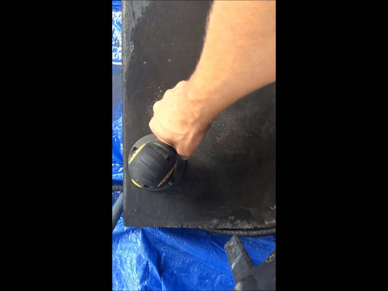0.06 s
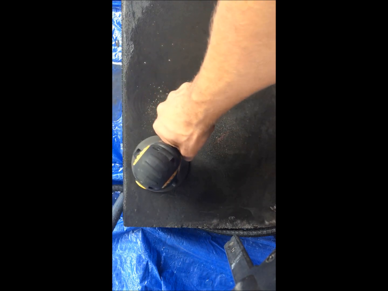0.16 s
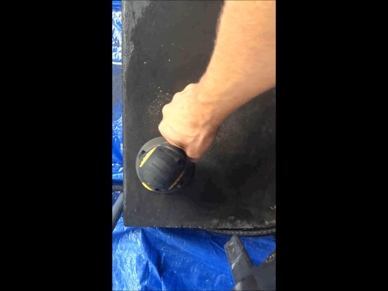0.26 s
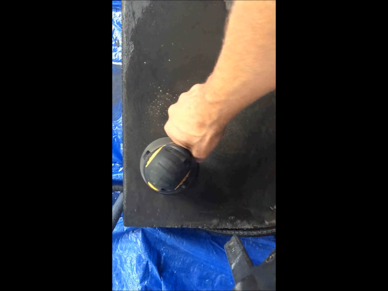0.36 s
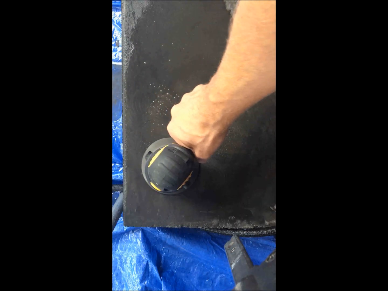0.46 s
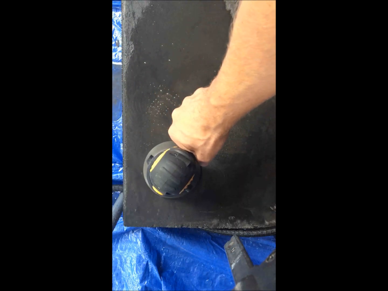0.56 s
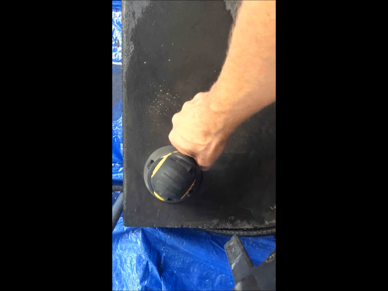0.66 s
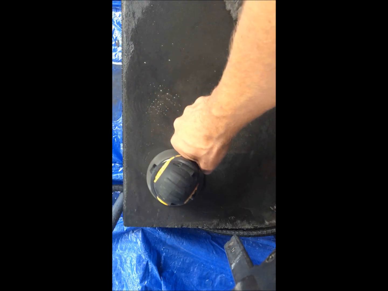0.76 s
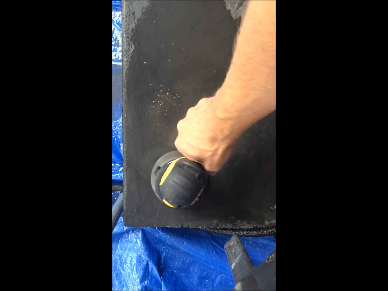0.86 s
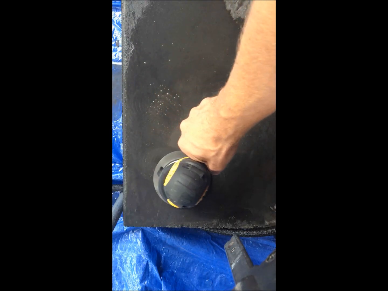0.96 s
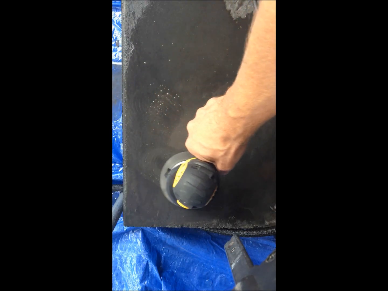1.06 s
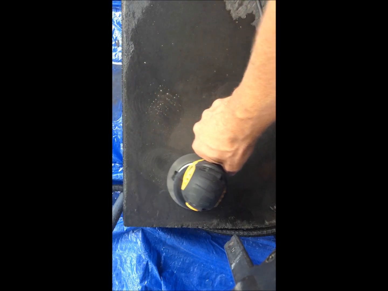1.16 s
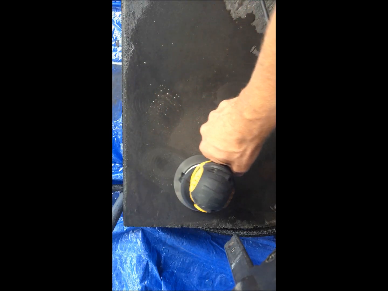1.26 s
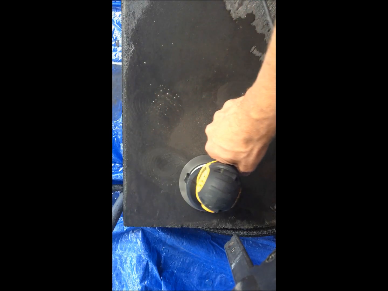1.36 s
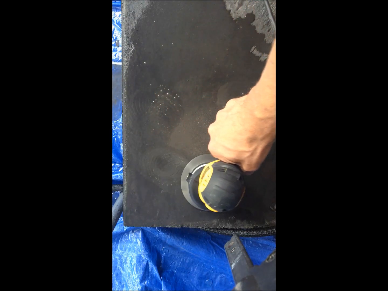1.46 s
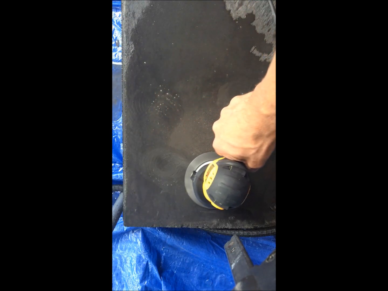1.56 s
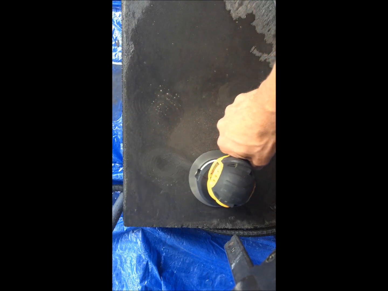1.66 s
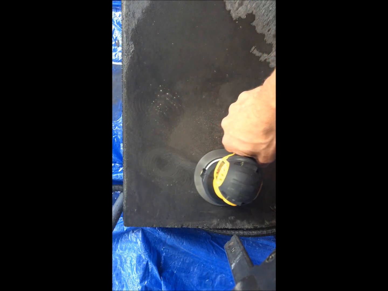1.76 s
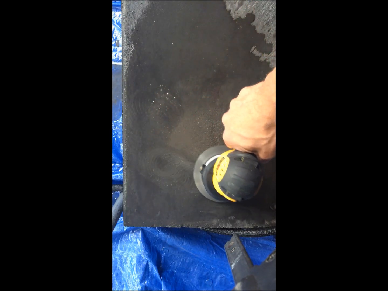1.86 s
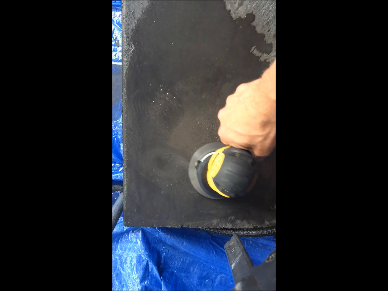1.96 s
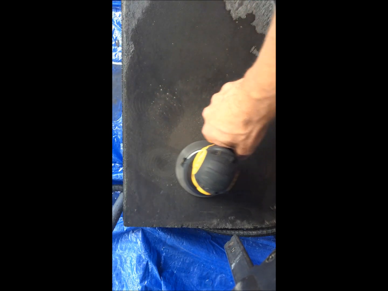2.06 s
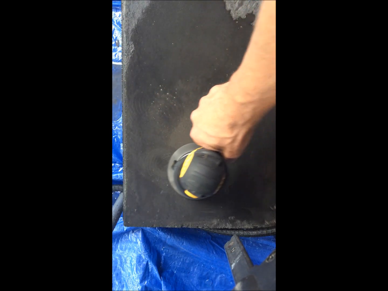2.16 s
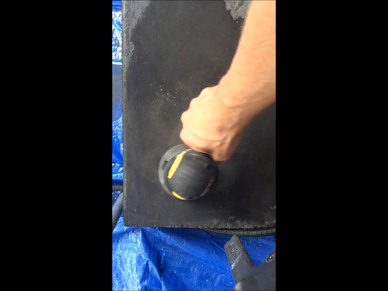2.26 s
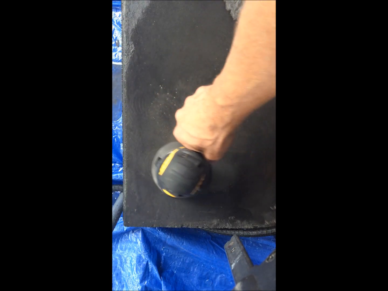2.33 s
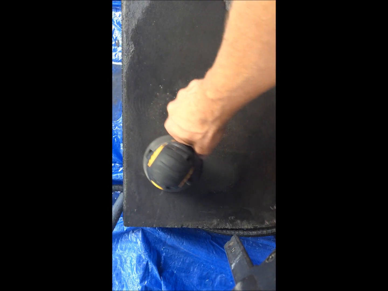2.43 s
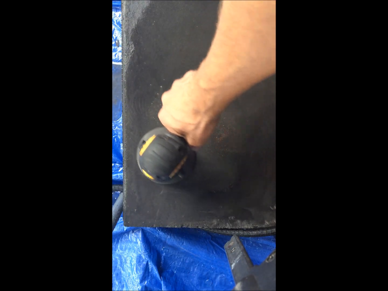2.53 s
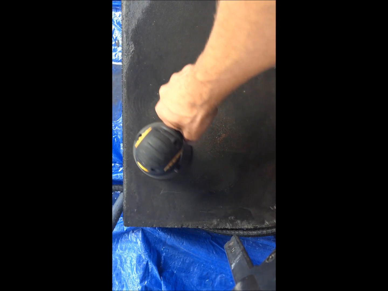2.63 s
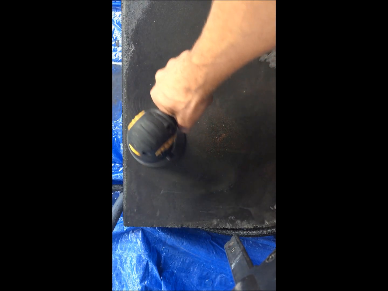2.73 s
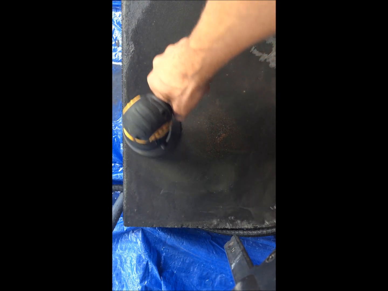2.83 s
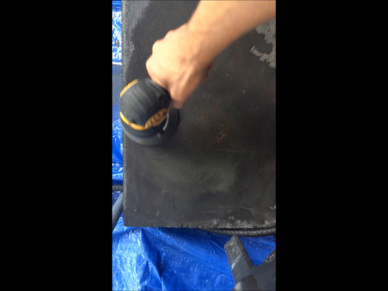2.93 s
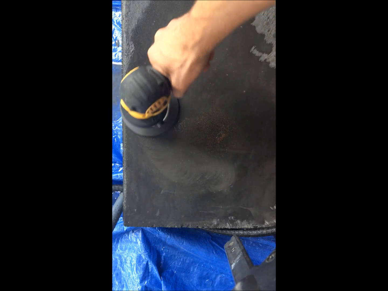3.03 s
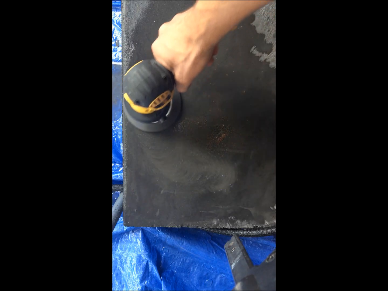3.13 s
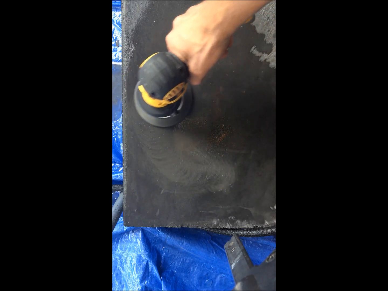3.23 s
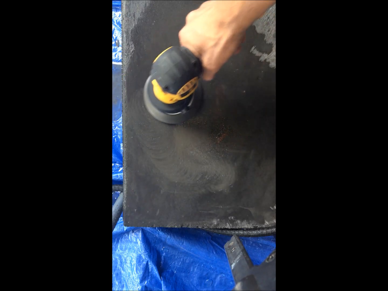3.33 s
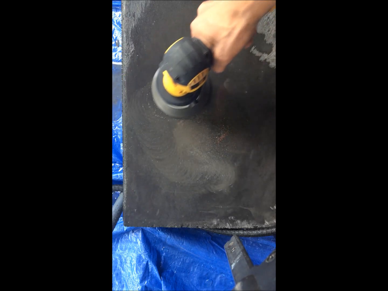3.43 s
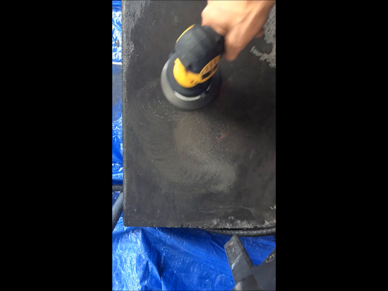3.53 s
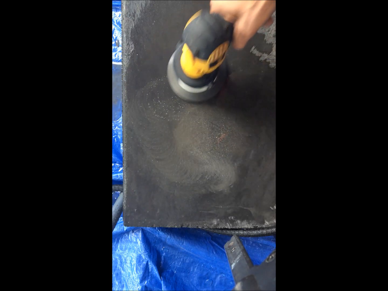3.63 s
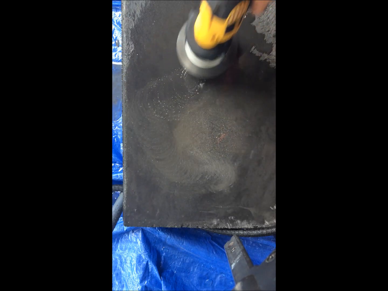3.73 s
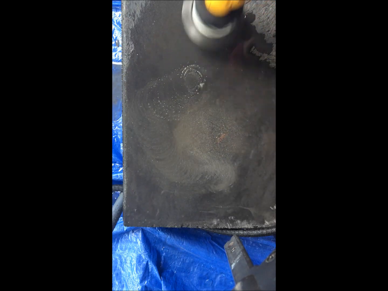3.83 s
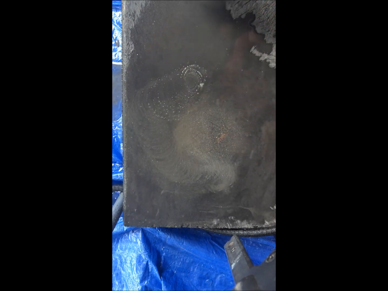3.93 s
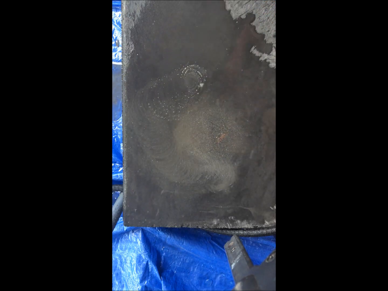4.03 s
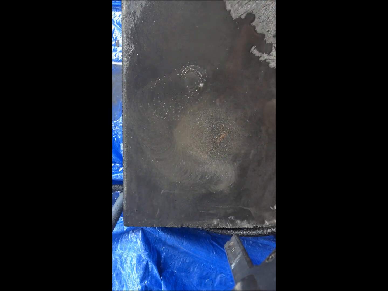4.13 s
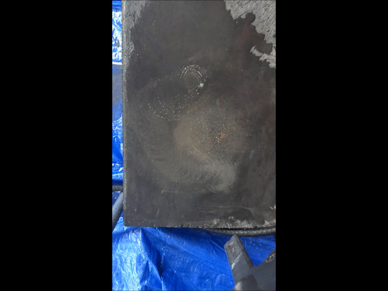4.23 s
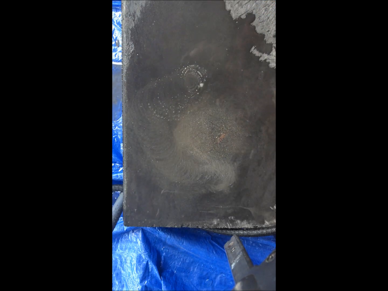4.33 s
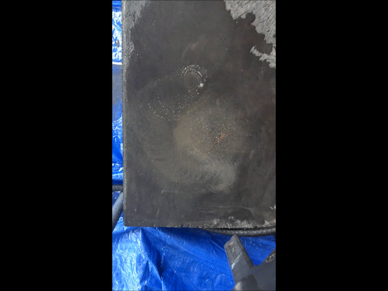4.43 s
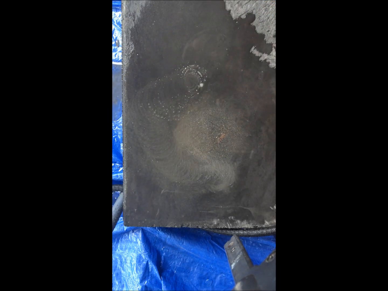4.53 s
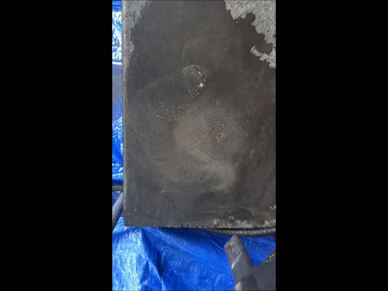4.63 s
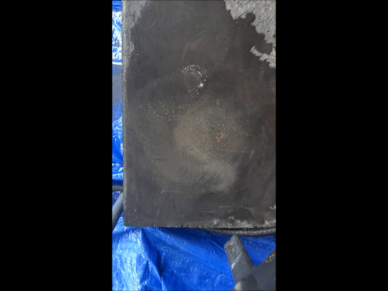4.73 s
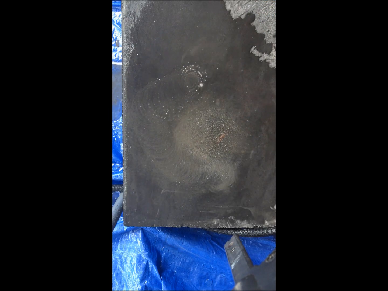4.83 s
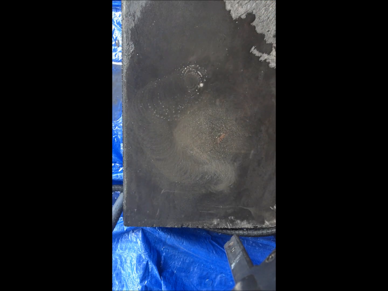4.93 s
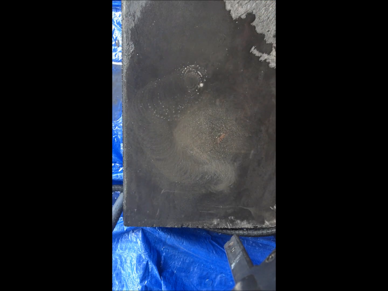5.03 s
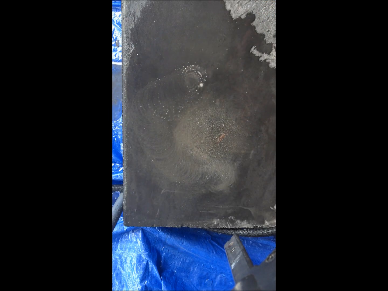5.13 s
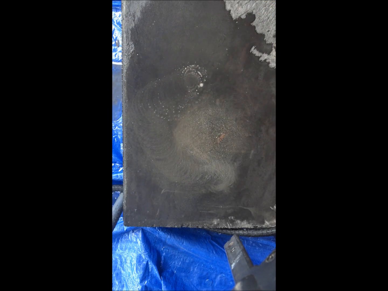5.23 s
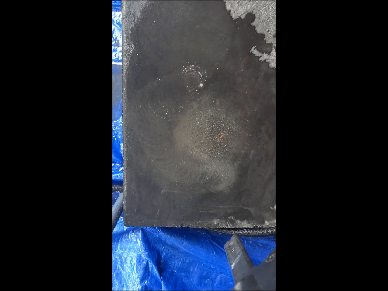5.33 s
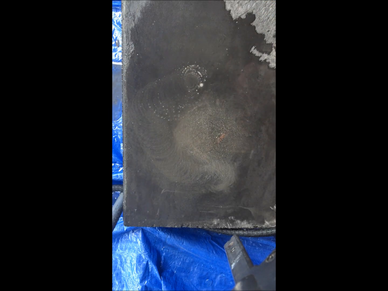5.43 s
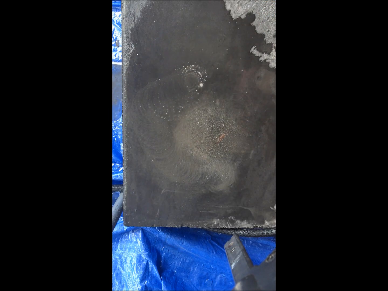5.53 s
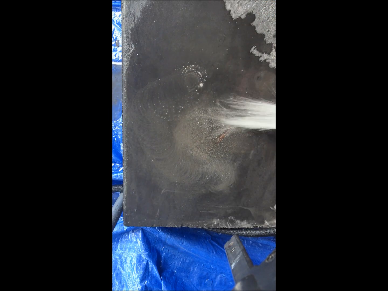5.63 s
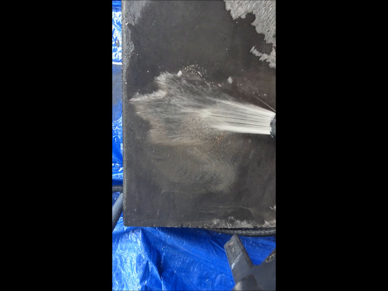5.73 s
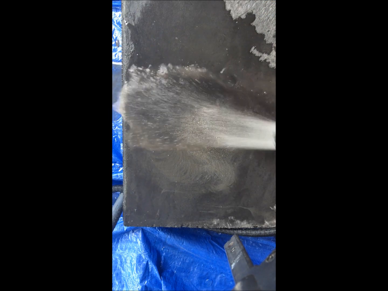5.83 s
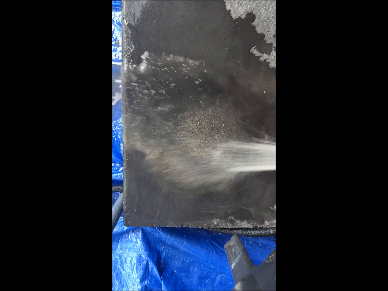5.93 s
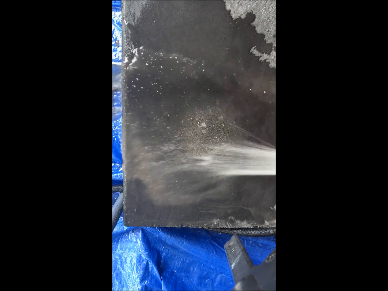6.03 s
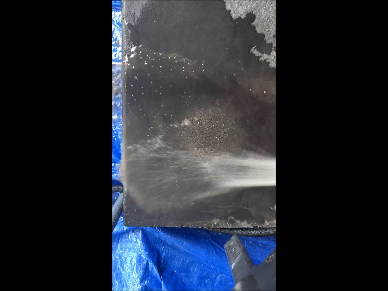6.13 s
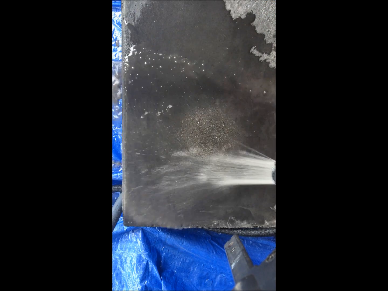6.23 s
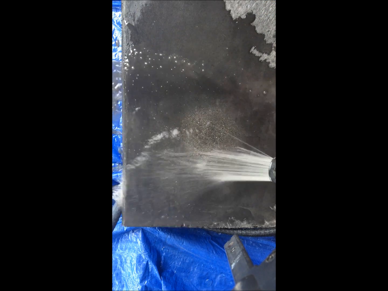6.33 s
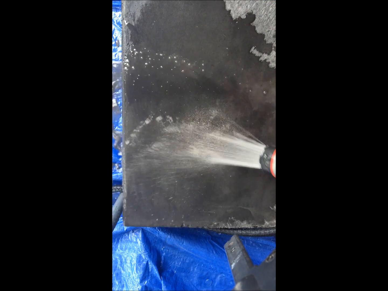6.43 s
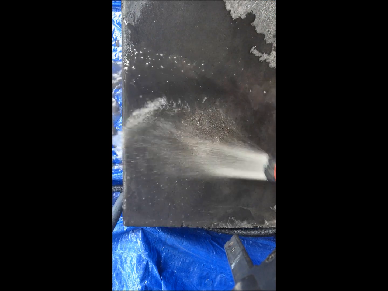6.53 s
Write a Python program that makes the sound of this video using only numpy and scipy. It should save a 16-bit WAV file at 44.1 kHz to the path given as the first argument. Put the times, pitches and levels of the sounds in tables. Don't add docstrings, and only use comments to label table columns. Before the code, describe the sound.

Close outdoors, a power sander grinds wet concrete with a bright, gritty hiss, throbbing about eighteen times a second. It lifts with a few scraping touches, and its motor whine slides down as the fan fades. A tarp rustles and snaps, the sander clacks onto a boomy bench, a nozzle clanks, then a thin water jet hisses steadily over faint insects.

```python
import sys
import numpy as np
from scipy import signal
from scipy.io import wavfile
from scipy.ndimage import uniform_filter1d

SR = 44100
rng = np.random.default_rng(int(sys.argv[2]) if len(sys.argv) > 2 else 0)


def boost_factor(decibels):
    exponent = np.asarray(decibels, float) / 20
    return 10 ** exponent


def persist_wave(psi):
    counts = np.round(np.clip(psi, -1, 1) * 32767).astype(np.int16)
    wavfile.write(sys.argv[1], SR, np.atleast_2d(counts).T)


N = 290178


def evened(x):
    return x / np.sqrt(np.mean(x ** 2) + 1e-20)


def read(points, hz):
    f, value = np.transpose(points)
    return np.interp(np.log(hz + 1), np.log(f + 1), value)


def curves(rows, fade=.01):
    s, *columns = np.transpose(rows)
    t = np.arange(N) / SR
    since_start = t - s[0] + fade * (s[0] < fade)
    until_end = s[-1] + fade - t
    gate = np.clip(np.minimum(since_start, until_end) / fade, 0, 1)
    return gate, *(np.interp(t, s, c) for c in columns)


def slow(per_s):
    lowpass = signal.butter(2, per_s, fs=SR, output="sos")
    return evened(signal.sosfilt(lowpass, rng.standard_normal(N)))


def hiss(shape, patchy_db=4.0, grit=0.0, grit_db=7.0):
    sizes = np.minimum(rng.exponential(1, N), 3)
    grains = rng.standard_normal(N) * boost_factor(grit_db * sizes) * (rng.random(N) < .15)
    source = rng.standard_normal(N) + grit * evened(grains)
    hz, _, z = signal.stft(source, SR, nperseg=1024, noverlap=768)
    patches = uniform_filter1d(rng.standard_normal(z.shape), size=7, axis=0)
    patches = evened(uniform_filter1d(patches, size=6, axis=1))
    colour = boost_factor(read(shape, hz)[:, None] + patchy_db * patches)
    return evened(signal.istft(z * colour, SR, nperseg=1024, noverlap=768)[1][:N])


def resonate(x, hz, width):
    r = np.exp(-np.pi * width / SR)
    if np.ndim(hz) == 0:
        return 2 * signal.lfilter([1 - r], [1, -r * np.exp(2j * np.pi * hz / SR)], x).real
    turn = np.exp(2j * np.pi * np.cumsum(hz) / SR)
    return 2 * (turn * signal.lfilter([1 - r], [1, -r], x * turn.conj())).real


def split(x, hz):
    low = signal.sosfiltfilt(signal.butter(2, hz, fs=SR, output="sos"), x)
    return low, x - low


def tone(hz, db, waver_db=1.0):
    return np.sqrt(2) * boost_factor(db + waver_db * slow(5)) * np.sin(2 * np.pi * np.cumsum(hz) / SR)


def grind():
    # time in seconds, pressure in dB, how flat the pad lies and rings in dB.
    hand = [(0.0, -17.5, -5.5), (0.35, -17, -0.5), (0.6, -21, 0), (1.1, -20, 3.5), (1.3, -17.5, -7.5),
            (1.55, -18, 6), (1.95, -19.5, 17), (2.2, -19.5, 8), (2.5, -18, 2.5), (3.0, -19, -0.5),
            (3.4, -19.5, -4), (3.53, -20, -3), (3.6, -33, -19), (3.66, -60, 0)]
    # frequency in Hz, level in dB per Hz.
    grit_spectrum = [(700, -61), (1200, -23), (2200, -14.5), (2650, -11), (2850, -3.5), (3900, -4),
                     (4650, -8), (4850, -8), (6400, -4), (7300, -6.5), (10100, -9.5), (10600, -13.5),
                     (12400, -12), (13500, -23)]
    # frequency in Hz, width in Hz, level in dB.
    pad_rings = [(3180, 200, -23.5), (3850, 700, -9), (4330, 110, -23), (4360, 92, -18)]
    # frequency in Hz, width in Hz, level in dB.
    rim_rings = [(3063, 240, -11), (4550, 260, -10)]
    # time in seconds, lead in turns, throb depth in dB.
    wobble = [(0.0, .5, 2.5), (.3, .52, 0.5), (.72, .46, 9.5), (.95, .37, 6.5), (1.35, .45, 4.5),
              (1.65, .46, 4.5), (2.05, .4, 0), (2.3, .15, -1.5), (2.8, .26, 1), (3.2, .03, 1.2),
              (3.6, .15, 2)]
    # time in seconds, depth in dB.
    chatter = [(1.82, 0), (1.86, 1), (2.0, 4.5), (2.03, 2.5), (2.07, 4), (2.12, 0.5)]
    # time in seconds, jump in dB.
    catches = [(.394, 0.5), (.449, -1), (0.712, -0.5), (.826, -1), (.882, -0.5), (.927, -5), (.939, 5),
               (1.049, 2.5), (1.33, 1), (1.012, 4), (1.022, 0), (1.255, -2), (1.458, 1), (1.513, 2),
               (1.684, 1), (1.741, 3), (1.774, 0.5), (1.81, -4), (2.119, 2), (2.146, 2.5), (2.202, 1),
               (2.227, -3.5), (2.253, 3.5), (2.311, 7), (2.369, 6.5), (2.397, -1), (2.407, 6), (2.465, 0.5),
               (2.488, 5), (2.5, -7), (2.515, 4.5), (2.541, 4), (2.593, 7.5), (2.604, -2), (2.63, 3.5),
               (2.767, 5), (2.799, 4.5), (2.877, 4.5), (2.917, 3), (2.935, -1.5), (2.979, 5), (3.01, -2),
               (3.038, -1), (3.092, 1.5), (3.147, -5), (3.229, 5), (3.281, 4.5), (3.313, -5), (3.34, 1),
               (3.37, 6)]
    # time in seconds, rim ring in dB, hiss in dB.
    slurry = [(0.0, -1, -0.5), (.3, -4.5, -4.5), (.6, 4.5, 0), (.9, 1.5, -3), (1.2, 1.5, 2), (1.5, 1, 0),
              (1.8, -5.5, -.5), (2.2, -16, -1.5), (2.6, -10.5, -2.5), (3.0, -13.5, 1), (3.4, -14, -2),
              (3.67, -10, 1)]
    pad_turns_per_s, treble_lag_turns = 17.7, .06
    chatter_per_s, chatter_peak_s, catch_s = 51, 1.967, .005
    t = np.arange(N) / SR

    gate, pressure_db, ring_db = curves(hand)
    bright_db = -7 + 0.64 * np.clip(-29 - pressure_db, 0, 12)

    _, lead, depth_db = curves(wobble)
    turn = 2 * np.pi * (pad_turns_per_s * t + lead)

    def throb_db(angle):
        return 0.9 * depth_db * (np.cos(angle) - 0.12 * np.cos(2 * angle) - 0.08 * np.sin(2 * angle))

    bite_db = throb_db(turn)
    late_db = throb_db(turn - 2 * np.pi * treble_lag_turns)

    catch_db = curves(chatter)[1] * np.cos(2 * np.pi * chatter_per_s * (t - chatter_peak_s))
    for s, db in catches:
        near = slice(round(s * SR) - 800, round(s * SR) + 800)
        catch_db[near] += db * np.exp(-((t[near] - s) / catch_s) ** 2)
    jitter_db = .9 * evened(resonate(rng.standard_normal(N), 60, 60)) + .6 * slow(250)

    grit = hiss(grit_spectrum, patchy_db=1.4, grit=.3)
    flat_ring = np.zeros(N)
    for hz, width, db in pad_rings:
        wandering_hz = hz * (1 + 0.021 * slow(18.0))
        flat_ring += boost_factor(db + 0.41 * slow(40)) * evened(resonate(grit, wandering_hz, width))
    _, rim_db, hiss_db = curves(slurry)
    rim = sum(boost_factor(db + rim_db) * evened(resonate(grit, hz, width)) for hz, width, db in rim_rings)

    low, high = split(grit, 5630)
    body = boost_factor(bite_db + catch_db) * (evened(low) + boost_factor(0.81 * ring_db) * flat_ring + rim)
    treble = boost_factor(bright_db + hiss_db + late_db + 0.29 * catch_db) * evened(high)
    return gate * boost_factor(pressure_db - 6.0 + jitter_db) * (body + treble)


def touches():
    # start in seconds, peak in dB, ring in Hz, width in Hz, held in seconds.
    contacts = [(3.4255, -1, 3470, 1260, 0.0033), (3.442, -8.5, 3300, 1000, 0.007),
                (3.476, -10, 3600, 1400, 0.01), (3.489, -11, 3130, 930, 0.0053),
                (3.536, -23, 4000, 1200, 0.0074), (3.546, -10, 3250, 900, 0.0085),
                (3.574, -13, 6600, 990, 0.0041), (3.585, -12.5, 4100, 1800, 0.0039),
                (3.613, -15.5, 3550, 980, 0.0065), (3.615, -22, 7600, 5800, 0.0077),
                (3.642, -27, 4000, 3000, .004), (4.061, -47, 300, 390, 0.075),
                (4.15, -43.5, 260, 380, 0.087), (5, -34.5, 2500, 1500, .05), (5.126, -27, 1300, 450, 0.04),
                (5.165, -36, 1350, 500, 0.045), (5.215, -46, 1100, 500, 0.065),
                (5.2, -42, 2300, 1500, 0.046), (5.079, -26.5, 1460, 900, 0.023),
                (5.093, -23.5, 2650, 1100, 0.025), (4.76, -31.5, 7500, 5000, 0.022),
                (5.7, -21, 6900, 1900, 0.038), (5.595, -44, 3000, 3000, .01), (5.27, -46, 1360, 640, 0.081),
                (5.607, -33, 5100, 900, 0.021), (5.647, -24.5, 3100, 900, .003),
                (5.721, -25, 7000, 4000, .001), (5.749, -26, 7000, 4000, .002),
                (6.044, -26, 7500, 4000, .001), (6.063, -35, 8500, 4000, .001)]
    out, t = np.zeros(N + 4000), np.arange(4000) / SR
    for s, db, hz, width, held in contacts:
        shape = np.clip(t / 0.001, 0, 1) * boost_factor(-60 * np.maximum(t - held, 0) / 0.045)
        noise = rng.standard_normal(4000)
        ring = evened(resonate(resonate(noise, hz, width), hz, width))
        out[round(s * SR):][:4000] += boost_factor(db - 12.0) * shape * ring
    return out[:N]


def motor():
    # time in seconds, housing roar in dB.
    fan = [(0.0, -41.5), (.5, -42.5), (2.3, -41.5), (3.1, -41.5), (3.55, -41.5), (3.7, -38), (3.92, -40.5),
           (4.03, -45), (4.06, -47), (4.15, -48.5), (4.2, -49.5), (4.3, -57), (4.6, -65)]
    # frequency in Hz, level in dB per Hz.
    roar_spectrum = [(88, -52), (150, -42), (311, -28.5), (404, -17), (578, -9.5), (636, -13), (716, -7),
                     (1010, -9.5), (1140, -9.5), (2120, -10.5), (2600, -35), (3380, -48), (5720, -120)]
    # frequency in Hz, width in Hz, level in dB.
    housing = [(1150, 210, 8), (750, 150, -14), (1780, 300, -7)]
    # frequency in Hz, level in dB per Hz.
    vent_spectrum = [(1300, -32), (2200, -11), (3000, -4), (4800, -2.5), (6500, 1.5), (7200, -4),
                     (9500, -4), (10300, -10.5), (13500, -11.5)]
    # time in seconds, pitch in Hz, level in dB.
    shaft = [(0.0, 276, -65), (0.27, 271, -70.5), (2.35, 279.4, -65.5), (3.09, 268, -67.5), (3.5, 254, -61)]
    gate, roar_db = curves(fan, fade=0.24)
    loaded, shaft_hz, shaft_db = curves(shaft, fade=0.061)
    roar = hiss(roar_spectrum, patchy_db=1.5)
    roar = evened(roar + sum(boost_factor(db) * evened(resonate(roar, hz, width)) for hz, width, db in housing))
    vent = hiss(vent_spectrum, patchy_db=2.0)
    vent_db = -38 + 0.52 * (roar_db + 37.0) + 8 * loaded
    air = gate * (boost_factor(roar_db - 0.5) * roar + boost_factor(vent_db) * vent)
    return air + loaded * tone(shaft_hz, shaft_db, waver_db=-0.5) + coast()


def coast():
    # order, resonance in Hz, width in Hz, level in dB.
    flares = [(12, 3180, 130, -48.5), (12, 2900, 350, -56), (12, 2600, 120, -58), (12, 2380, 150, -49),
              (18, 3950, 200, -58), (18, 3600, 250, -53), (18, 4560, 200, -48), (18, 3250, 200, -51),
              (20, 4350, 300, -56), (20, 3580, 200, -51), (24, 6350, 200, -46), (24, 5470, 360, -40),
              (24, 4750, 110, -44), (24, 4000, 900, -54), (36, 8070, 200, -53), (16, 4000, 120, -54),
              (16, 3150, 300, -53)]
    lifted_s, off_s, still_s, hidden_s = 3.63, 3.72, 4.5, 4.033
    brush_hz, sag_hz_per_s, drag_s = 3183, 2200, 2.96
    free = curves([(lifted_s, 1), (still_s, 1)])[0]
    since_off = np.maximum(np.arange(N) / SR - off_s, 0)
    shaft_hz = (brush_hz - sag_hz_per_s * drag_s * (1 - np.exp(-since_off / drag_s))) / 12
    out = np.zeros(N)
    for order in {row[0] for row in flares}:
        hz = np.maximum(order * shaft_hz, 0)
        size = sum(boost_factor(db) * np.exp(-((hz - at) / width) ** 2)
                   for k, at, width, db in flares if k == order)
        blur = evened(resonate(rng.standard_normal(N), hz, 140))
        out += size * (tone(hz, 0, waver_db=1) + boost_factor(-5.0) * blur)
    hidden = np.clip((since_off + off_s - hidden_s) / 0.0092, 0, 1)
    return free * out * boost_factor(-8 * hidden)


def knocks(rows, modes, crack_db, crack_t60):
    out, t = np.zeros(N + 8000), np.arange(8000) / SR
    rise = np.clip(t / .001, 0, 1)
    for s, db, thud_db, tick_db, ring in rows:
        noise = rng.standard_normal(8000)
        body = np.zeros(8000)
        for hz, mode_db, t60 in modes:
            uneven, detune, phase = rng.standard_normal(3)
            decay_db = -60 * t / (t60 * np.clip(2 * ring, .4, 1.5))
            swell = np.clip(t * hz, 0, 1)
            wave = np.sin(2 * np.pi * hz * (1 + .03 * detune) * t + 3 * phase)
            body += boost_factor(mode_db + 2 * uneven + decay_db) * swell * wave
        crack_band = split(split(noise, 4500)[0], 230)[1]
        crack = boost_factor(crack_db - 60 * t / crack_t60) * evened(crack_band)
        thud = boost_factor(thud_db - 60 * t / 0.097) * np.sin(2 * np.pi * 130 * t) * np.clip(t / 0.0028, 0, 1)
        tick = boost_factor(tick_db - 60 * t / 0.076) * split(split(noise, 9400)[0], 5100)[1]
        out[round(s * SR):][:8000] += (boost_factor(db) * (body / abs(body).max() + crack) + thud + tick) * rise
    return out[:N]


def bench_knocks():
    # start in seconds, peak in dB, thud in dB, tick in dB, decay time factor.
    blows = [
        (4.7675, -24, -45, -40, .3),
        (4.774, -13, -34, -24, .3),
        (4.7758, -8, -26, -24, .4),
        (4.783, -17, -36, -38, .4),
        (4.79, -17, -38, -44, .4),
        (4.7965, -23, -42, -47, .4),
        (4.826, -27, -46, -47, .4),
        (4.8408, -15, -46, -33, .25),
    ]
    # frequency in Hz, level in dB, t60 in seconds.
    bench = [(137, -4, 0.037), (258, -5.5, 0.034), (396, 0, 0.024), (635, 9.5, 0.0091), (770, -11, 0.018),
             (1350, -1.5, 0.01406), (2120, -2, 0.0041), (3040, 4.5, 0.0051)]
    return knocks(blows, bench, crack_db=-12.0, crack_t60=0.028)


def nozzle_clanks():
    # start in seconds, peak in dB, thud in dB, tick in dB, decay time factor.
    blows = [
        (5.085, -28, -61, -29, 0.64),
        (5.103, -23, -64, -31, 0.44),
        (5.114, -14.5, -57, -25, 0.64),
        (5.118, -29, -60.0, -37, 0.45),
        (5.126, -26.5, -61, -46, 0.42),
        (5.132, -28, -61, -45, 0.5),
    ]
    # frequency in Hz, level in dB, t60 in seconds.
    nozzle = [(620, -5, .04), (1050, -4, .03), (1270, -3, .03), (1470, -1, .04), (1750, -5, .025),
              (2250, -4, .02), (2700, -4, .025)]
    return knocks(blows, nozzle, crack_db=-6.0, crack_t60=0.025)


def hose_bumps():
    # start in seconds, peak in dB, thud in dB, tick in dB, decay time factor.
    blows = [
        (5.066, -38.5, -35, -57, 0.79),
        (6.017, -43.5, -49, -80, 0.41),
        (6.051, -42, -62, -62.0, 0.39),
        (6.088, -38.5, -52, -62.0, 0.24),
        (6.13, -46, -60, -60, .6),
        (6.323, -30, -62, -50, 0.5),
        (6.519, -38, -64, -73, 0.27),
    ]
    # frequency in Hz, level in dB, t60 in seconds.
    hose = [(256, -1.5, 0.074), (330, -3.5, 0.05), (1240, -5, 0.025), (2280, -6.5, 0.018)]
    return knocks(blows, hose, crack_db=-10, crack_t60=.05)


def snaps():
    # start in seconds, peak in dB, treble in dB, t60 in seconds, held in seconds.
    bursts = [(4.449, -51, 6, 0.017, 0.0016), (4.477, -50, 1, 0.017, 0.0056), (4.525, -45, 8, .015, 0.0018),
              (4.538, -42, 3, 0.014, 0.0016), (4.61, -42, 1, 0.033, 0.017), (4.686, -35.5, -2, .03, 0.0025),
              (4.716, -41, -4, 0.023, 0.0052), (4.745, -43, 2, .02, .003), (4.874, -44, 5, 0.017, 0.0017),
              (4.93, -40.5, 4.5, .02, 0.0052), (4.961, -57, -4, .015, 0.0026),
              (5.029, -45, -1, 0.012, .002), (5.056, -35, -11, 0.0092, 0.0017),
              (5.299, -70.5, -6, 0.022, .003), (5.571, -60, -4, .015, .003)]
    out, t = np.zeros(N + 4000), np.arange(4000) / SR
    for s, db, treble_db, t60, held in bursts:
        noise = rng.standard_normal(4000)
        low, high = split(split(noise, 10800)[0], 3600)
        mid = split(low, 702)[1]
        shape = np.clip(t / 0.0019, 0, 1) * boost_factor(-60 * np.maximum(t - held, 0) / max(t60, .005))
        out[round(s * SR):][:4000] += boost_factor(db) * shape * (evened(mid) + boost_factor(treble_db) * evened(high))
    return out[:N]


def rustle():
    # time in seconds, level in dB.
    motion = [
        (4.25, -52),
        (4.5, -58),
        (4.8, -46),
        (5.0, -47),
        (5.25, -56),
        (5.5, -77.5),
    ]
    gate, level_db = curves(motion, fade=0.025)
    texture = dict(patchy_db=1.5, grit=.7)
    shuffle = hiss([(60, -24), (150, -7.5), (900, -10.5), (1600, -10.5), (3000, -26.5)], **texture)
    crinkle = hiss([(1000, -24), (2200, 5.5), (3300, 4.5), (6000, -3.5), (9500, -6.0), (12000, -30.0)],
                   **texture)
    clumps_db = 1.5 * slow(30)
    low_db = -52 + 0.81 * (level_db + 49)
    return gate * boost_factor(clumps_db) * (boost_factor(low_db) * shuffle + boost_factor(level_db) * crinkle)


def jet():
    # time in seconds, flow in dB.
    flow = [(5.594, -54), (5.603, -49), (5.609, -40), (5.624, -39.5), (5.641, -34), (5.648, -36.5),
            (5.677, -35.5), (5.687, -37), (5.74, -38), (5.87, -42), (6.32, -41.5), (6.42, -42), (6.58, -40)]
    # frequency in Hz, level in dB per Hz.
    spray_spectrum = [(1470, -57), (2500, -41), (3530, -37), (4070, -13), (4820, -15), (5320, -8),
                      (6260, -10), (7950, -9), (9220, -3.5), (10400, -9), (11500, -3.5), (12700, -5.5),
                      (13500, -13.5)]
    # frequency in Hz, level in dB per Hz.
    splash_spectrum = [(300, -14), (900, -7.5), (1500, -6.5), (2600, -6), (4000, -3), (6000, 0.5),
                       (9000, -8)]
    gate, flow_db = curves(flow, fade=.003)
    spray = boost_factor(flow_db + .8 * slow(40)) * hiss(spray_spectrum, patchy_db=1.5, grit=.4)
    splash_db = -58.5 + 2.1 * (flow_db + 45.5) + 1.1 * slow(40)
    splash = boost_factor(splash_db) * hiss(splash_spectrum, patchy_db=0.0, grit=0.74)
    water = rng.standard_normal(N)
    low_song = evened(resonate(resonate(water, 715 + 18 * slow(8), 80), 715, 150))
    high_song = evened(resonate(resonate(water, 900, 90), 900, 140))
    song = boost_factor(-56.5 + 2.2 * slow(12)) * (low_song + boost_factor(-7) * high_song)
    return gate * (spray + splash + song)


def background():
    # frequency in Hz, width in Hz, level in dB.
    insect_bands = [(7700, 64, -6), (8370, 125, 4), (9100, 110, -4), (8960, 83, -4), (9280, 190, -1.5),
                    (9550, 100, -2), (11500, 72, -16), (12060, 77, -21.5)]
    # time in seconds, level in dB.
    breeze = [(0.0, -66), (2.0, -70), (3.0, -63), (3.6, -65.5), (4.8, -58.5), (6.58, -62.5)]
    # frequency in Hz, level in dB per Hz.
    air_spectrum = [(25, -31), (60, -20.5), (166, -20), (260, -17), (500, -21.5), (850, -24), (1100, -20),
                    (2000, -34), (4000, -42), (7000, -36.5), (10500, -28.5), (13500, -56.5)]
    drone_hz, swell_s, swell_length_s, drone_ends_s = 242, 3.4, 0.086, 4.38
    t, noise = np.arange(N) / SR, rng.standard_normal(N)

    song = sum(boost_factor(db) * evened(resonate(resonate(noise, hz, width), hz, 3 * width))
               for hz, width, db in insect_bands)
    trill = 1 + .5 * np.sin(2 * np.pi * np.cumsum(63 + 0.55 * slow(3.7)) / SR)
    insects = boost_factor(-60.0) * evened(song * trill)

    swell_db = 19 * np.exp(-((t - swell_s) / swell_length_s) ** 2)
    drone_db = -70.5 + swell_db - 200 * np.maximum(t - drone_ends_s, 0)
    machine = tone(np.full(N, drone_hz), drone_db, waver_db=2.5)

    hum = boost_factor(curves(breeze)[1]) * evened(resonate(resonate(rng.standard_normal(N), 58.5, 7.9), 55, 40))
    return boost_factor(-57.5) * hiss(air_spectrum) + insects + hum + machine


def yard(x):
    # frequency in Hz, t60 in seconds.
    decay = [(200, 0.47), (530, 0.47), (1390, 0.46), (3700, 0.2), (9000, 0.25)]
    hz, t, z = signal.stft(rng.standard_normal(SR // 2), SR, nperseg=256)
    tail = signal.istft(z * boost_factor(-60 * t / read(decay, hz)[:, None]), SR, nperseg=256)[1]
    tail = np.r_[np.zeros(200), tail]
    return signal.fftconvolve(x, tail / np.linalg.norm(tail))[:N]


def scene():
    sander = grind() + touches()
    hits = snaps() + bench_knocks() + nozzle_clanks()
    bumps = hose_bumps()
    echoes = yard(boost_factor(-14.5) * sander + boost_factor(-9.0) * hits + boost_factor(-5.0) * bumps)
    return (sander + motor() + hits + bumps + echoes + rustle() + jet() + background())[None]


def roll_off(x):
    return signal.sosfilt(signal.butter(12, 14220, fs=SR, output="sos"), x)


def record(dry):
    dry = signal.sosfilt(signal.butter(2, 45, "high", fs=SR, output="sos"), dry)
    dry = .9 * np.tanh(dry / .9)
    edge = signal.firwin(2001, 13140, window=("kaiser", 9), fs=SR)
    limited = signal.oaconvolve(dry, edge[None], "same")
    landing = curves([(4.771, 1), (4.779, 1)], fade=.003)[0]
    snap = curves([(4.928, 1), (4.934, 1)], fade=.003)[0]
    return roll_off(limited + boost_factor(-6.0) * (landing + snap) * (dry - limited))


dry = scene()
out = record(dry)
persist_wave(out)
```